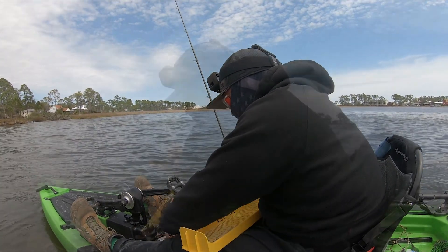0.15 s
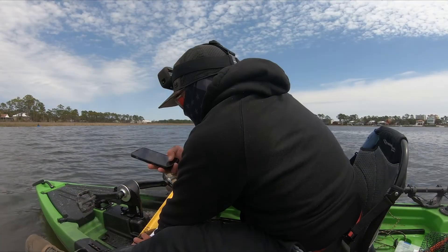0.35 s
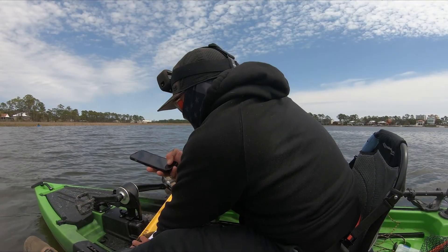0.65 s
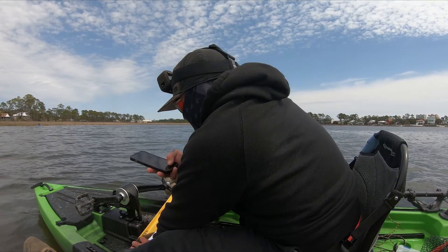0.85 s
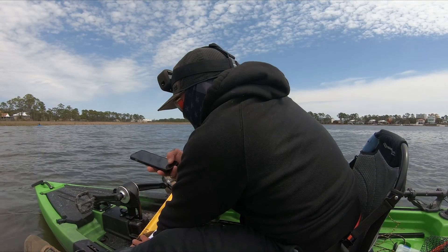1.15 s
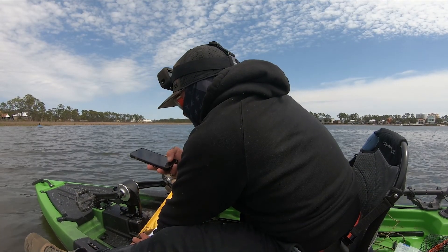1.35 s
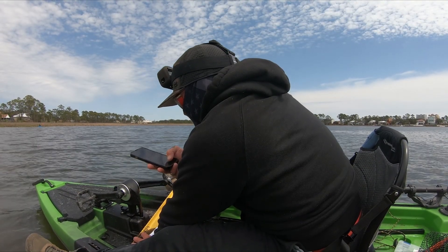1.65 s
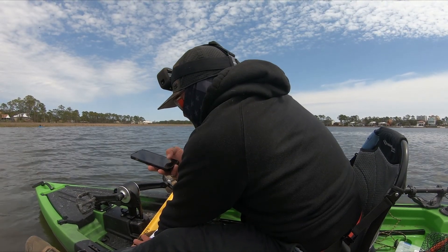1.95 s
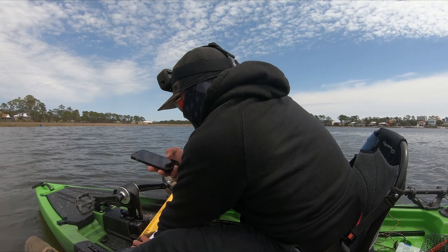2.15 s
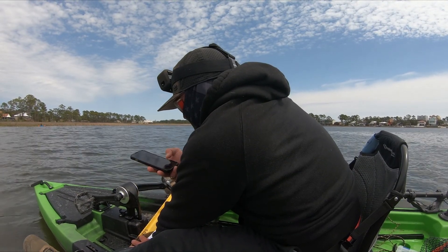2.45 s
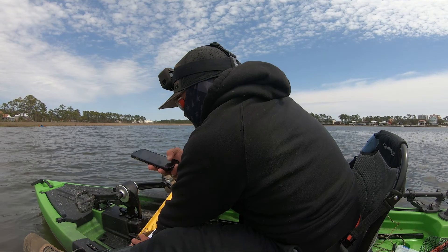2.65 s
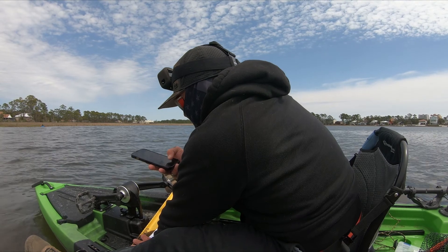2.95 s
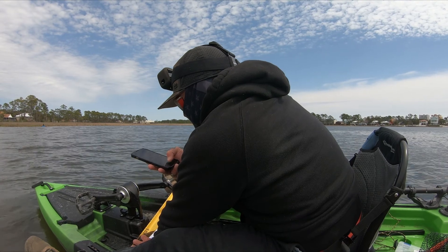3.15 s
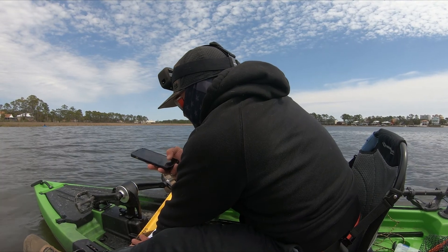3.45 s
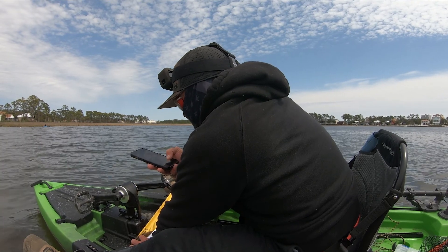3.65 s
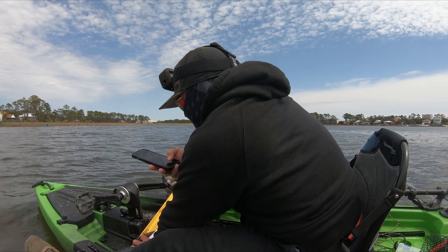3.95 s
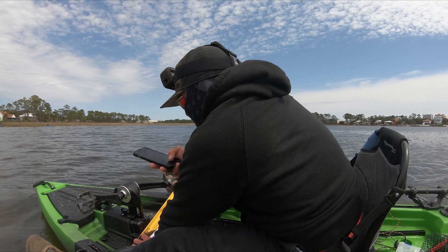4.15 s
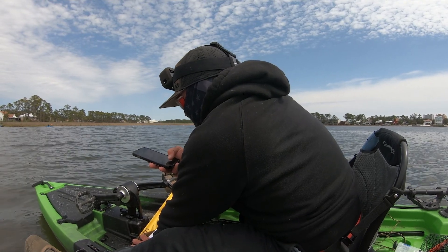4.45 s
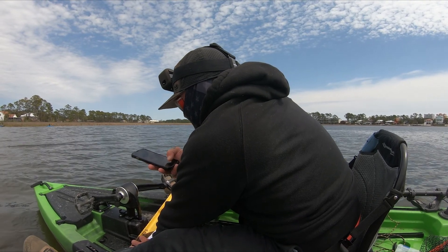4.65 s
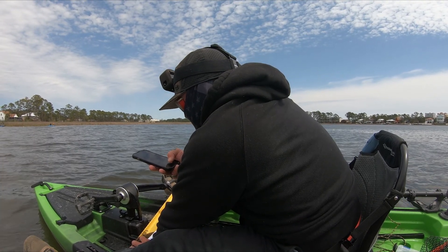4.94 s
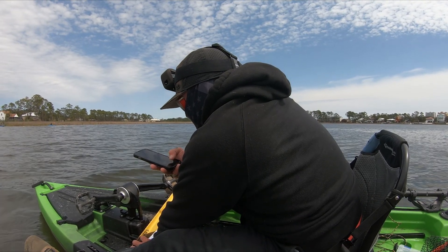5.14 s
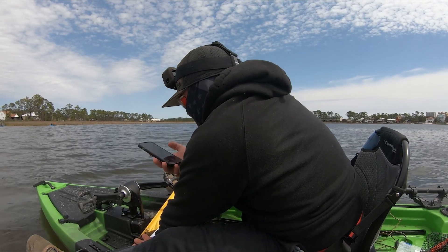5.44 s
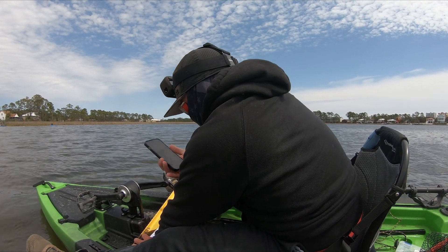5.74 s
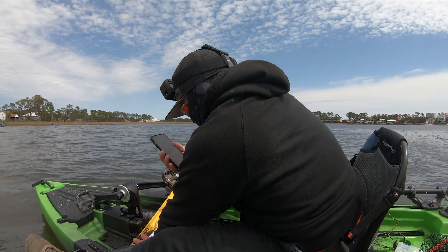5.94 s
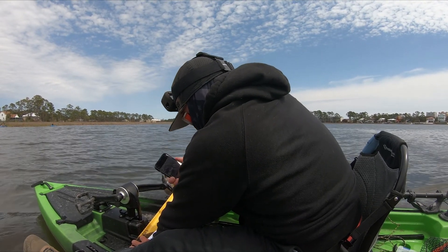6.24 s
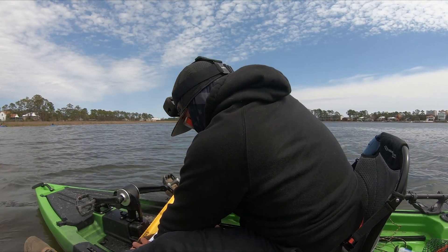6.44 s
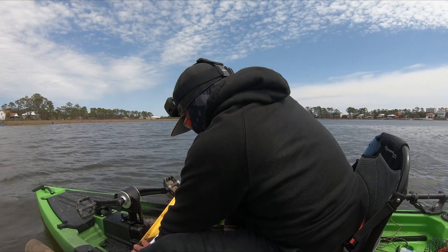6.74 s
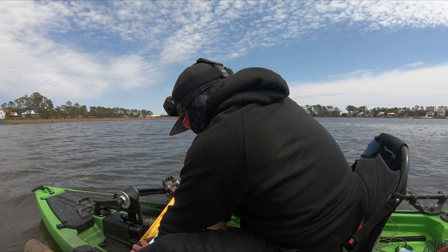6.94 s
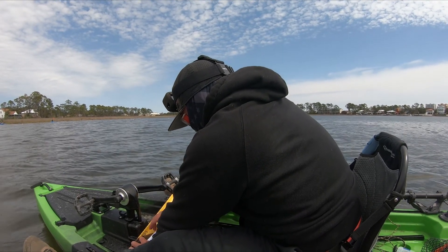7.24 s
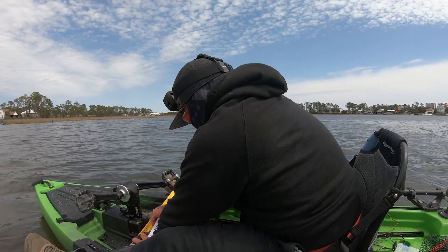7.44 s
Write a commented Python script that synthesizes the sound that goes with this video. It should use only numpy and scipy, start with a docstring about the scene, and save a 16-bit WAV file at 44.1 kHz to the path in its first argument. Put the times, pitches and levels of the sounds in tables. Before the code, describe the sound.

Choppy water slaps a drifting plastic kayak with hollow knocks, drips and low wind rumble, ending in a burst of hard knocks.

```python
"""A plastic kayak drifts on choppy open water, heard at a microphone fixed to the boat. Shaped noise carries
wind, heave, drone, wash and spray; at 0.25 s this background jumps abruptly to another level, with a click as a
short low rise stops dead. Wavelets then slap the hull as briefly swelling sines, and from 0.52 to 5.15 s faint,
thin tones glide. Knocks and scrapes excite resonances of hull and fittings, treble bursts are brief noise and
drops are rising, dying sines, all scattered; the hardest knock falls at 6.96 s."""
import sys
import numpy as np
from scipy import signal
from scipy.fft import rfft, irfft, next_fast_len
from scipy.io import wavfile

SR = 44100
rng = np.random.default_rng(int(sys.argv[2]) if len(sys.argv) > 2 else 0)


def master_out(mix):
    """Clip the mix to full scale and print it as 16-bit PCM to the path in sys.argv[1]."""
    frames = np.transpose(np.atleast_2d(mix))
    ceiling = np.clip(frames, -1, 1)
    pcm = np.round(ceiling * 32767).astype(np.int16)
    wavfile.write(sys.argv[1], SR, pcm)


N = 334719
JUMP_S = 0.2516   # the background jumps to another level here
DULL_ABOVE = 1.65   # a crack or rub is dull above this multiple of its colour

# wavelets on the hull: t/s, peak level/dB, panel pitch f/Hz, swell time/ms
SLAPS = [(0.431, -29.5, 179, 11), (0.57, -30.5, 176, 7.5), (0.609, -30, 217, 14.5),
         (0.924, -28.5, 206, 23.7), (1.487, -18.5, 199, 6.2), (1.507, -21, 182, 10),
         (1.549, -30, 158.3, 26), (1.758, -31, 162, 17), (1.861, -17.5, 187, 13.8), (1.882, -23, 189, 10),
         (1.96, -28, 219, 10), (2.1, -29.5, 161, 4.3), (2.187, -31.5, 148, 4.2), (2.404, -30, 252, 4.3),
         (2.658, -28, 155, 14), (2.816, -16, 230, 4), (2.848, -25, 218, 15), (2.819, -21.5, 335, 8),
         (2.866, -29.5, 199, 9), (2.979, -30, 182, 5), (3.137, -30.5, 177, 9.7), (3.443, -28, 197, 16),
         (3.571, -20, 193.5, 9.8), (3.598, -14.5, 195, 9), (3.642, -26.5, 171, 9.3),
         (3.737, -30.5, 188, 10.3), (3.785, -29.5, 159, 4.3), (3.96, -26, 149, 7.4), (4.012, -17, 184, 9.9),
         (4.491, -23.5, 158, 23), (4.527, -23, 195, 14.4), (4.76, -15, 180, 6.3), (4.827, -20, 162, 6),
         (4.971, -24.5, 169, 2.9), (5.07, -28, 202, 2.3), (5.148, -27.5, 170, 9.7),
         (5.331, -17.5, 212, 10.6), (5.359, -22, 231, 9.8), (5.506, -29, 153.6, 14.5),
         (5.667, -23, 154.8, 16.5), (5.785, -26, 175, 10.7), (5.913, -27, 177, 5.9), (5.934, -30, 219, 12),
         (6.21, -28, 175, 5.2), (6.264, -18.5, 176, 6.3), (6.41, -12.5, 202.8, 15.5),
         (6.457, -24.5, 178, 13), (6.722, -30, 149, 5.1), (6.818, -15, 365, 7.7), (6.931, -18, 203, 2.7),
         (6.958, -17, 416, 14), (6.999, -19.5, 205, 9), (7.006, -26, 326, 6.5), (7.133, -16.5, 220, 4.3),
         (7.156, -33, 236.4, 30), (7.445, -25.5, 176, 14.6), (7.481, -21.5, 214, 9.9)]
# resonant modes of the hull: f/Hz, relative gain/dB, t60/s
HULL_MODES = [(301, 3.5, 0.1), (352, 6, 0.065), (403.4, -0.5, 0.08), (503.6, 5, 0.035), (560, -2.5, 0.091),
              (610, -2, 0.15), (687.5, 0, 0.062), (759, -5.5, .07), (876, -7, 0.07), (1000, 2.5, 0.025),
              (1180, -4.5, 0.034), (1260, -5, 0.041), (1400, -3.5, 0.024)]
# stiff deck fittings, resonances that colour a crack: f/Hz, bandwidth/Hz
FITTINGS = [(1720, 220), (2000, 680), (2350, 200), (2700, 340), (3100, 95), (3600, 72), (4150, 150),
            (4700, 220)]


def amp(db):
    """Level in dB to amplitude ratio: 20 dB is a factor of ten."""
    return 10 ** (np.asarray(db) / 20)


def rms_one(x):
    """Normalise the mean power to 1."""
    return x / np.sqrt(np.mean(x ** 2) + 1e-20)


def drift(rate_hz):
    """Low-passed chance: white noise through a double pole at rate_hz wanders with spread 1."""
    step = 40   # samples between drawn values
    r = np.exp(-2 * np.pi * step * rate_hz / SR)
    white = rng.standard_normal(N // step + 2002)
    slow = signal.lfilter([1], [1, -2 * r, r * r], white)[2000:]
    return np.interp(np.arange(N) / step, np.arange(len(slow)), rms_one(slow - slow.mean()))


def noise(spectrum):
    """Spectral shaping: white noise weighted by frequency gives steady coloured noise of rms 1."""
    size = next_fast_len(N)
    hz = np.maximum(np.arange(size // 2 + 1) * SR / size, 1)
    at, level_db = np.transpose(spectrum)
    gain = amp(np.interp(np.log(hz), np.log(at), level_db, left=-120, right=-120))
    return rms_one(irfft(rfft(rng.standard_normal(size)) * gain, size)[:N])


def ring(clicks, hz, t60):
    """Damped resonance: a unit click starts a sine of height 1 that decays 60 dB in t60 seconds."""
    r, w = amp(-60 / (t60 * SR)), 2 * np.pi * hz / SR
    return signal.lfilter([0, np.sin(w)], [1, -2 * r * np.cos(w), r * r], clicks + 1e-18)


def struck(hz, width_hz, t):
    """Modal impulse response: each mode decays in proportion to its bandwidth."""
    return np.exp(-np.pi * np.outer(width_hz, t)) * np.sin(2 * np.pi * np.outer(hz, t))


def soften(x, hz):
    """Contact compliance: a two-pole low-pass dulls a soft contact."""
    return signal.lfilter(*signal.butter(2, hz, fs=SR), x)


def grains(per_s, low_hz, high_hz, cycles, spread_db, count):
    """Random superposition: scattered clicks each ring at one of several pitches, t60 in cycles; rms 1."""
    sizes = amp(spread_db * np.minimum(rng.exponential(1, N), 4)) * (rng.random(N) < per_s / SR)
    dealt = rng.integers(0, count, N)
    pitches = np.geomspace(low_hz, high_hz, count)
    return rms_one(sum(ring(sizes * (dealt == k), hz, cycles / hz) for k, hz in enumerate(pitches)))


def patchy(x, edges_hz, shared_db, own_db):
    """Band-wise modulation: each band flickers partly on its own."""
    out = 0
    for low, high in zip(edges_hz, edges_hz[1:]):
        band = signal.sosfilt(signal.butter(1, [low, high], "band", fs=SR, output="sos"), x)
        out = out + band * amp(shared_db + own_db * drift(26.0))
    return rms_one(out)


def curve(rows):
    """Linear interpolation: the columns of a (t/s, level/dB, ..) table at every sample."""
    s, *columns = np.transpose(rows)
    return [np.interp(np.arange(N) / SR, s, c) for c in columns]


def add(out, s, sound):
    """Superposition: mix a short sound in at time s."""
    i = int(round(s * SR))
    out[i:i + len(sound)] += sound[:N - i]


def faint_tones():
    """Frequency and amplitude modulation: thin gliding sines whose pitch and level waver at random."""
    # faint tones: start t/s, end t/s, first f/Hz, last f/Hz, level before the waver/dB
    glides = [(.52, .78, 2920, 2900, -80), (2.5, 2.62, 3350, 3250, -76), (2.7, 2.8, 3100, 3050, -76),
              (3.27, 3.47, 4170, 4230, -85), (3.6, 3.8, 3720, 3780, -85), (4.53, 4.76, 1830, 1830, -72),
              (4.6, 4.76, 2150, 2200, -76), (4.62, 4.73, 3160, 3120, -81), (4.7, 4.87, 2830, 2880, -77),
              (4.86, 5.05, 2860, 2915, -75.5), (4.97, 5.14, 3380, 3365, -84), (5.02, 5.15, 1830, 1820, -76)]
    out = np.zeros(N)
    waver = amp(2.5 * drift(25.0))
    blur = 1 + .004 * drift(40.0)
    for start, end, first_hz, last_hz, db in glides:
        i, size = round(start * SR), round((end - start) * SR)
        pitch_hz = np.linspace(first_hz, last_hz, size) * blur[i:i + size]
        phase = 2 * np.pi * np.cumsum(pitch_hz) / SR
        add(out, start, amp(db) * signal.windows.tukey(size, .3) * np.sin(phase))
    return out * waver


def stir():
    """Incoherent addition: the stirring swells round every slap and dies away; powers add."""
    rise_s, t60_s = 0.0019, 0.32
    power, t = np.zeros(N), np.arange(SR) / SR
    shape = (1 - np.exp(-t / rise_s)) * amp(-60 * t / t60_s)
    for s, db, *_ in SLAPS:
        add(power, s - rise_s, (amp(db) * shape) ** 2)
    return np.sqrt(power)


def levels():
    """Power addition of base and stirred gains for rumble, heave, drone, wash, spray, after a steady start."""
    # wind on the microphone port: t/s, rumble level/dB
    wind = [(0.26, -42), (0.28, -38.5), (1.32, -43.5), (1.56, -37), (1.81, -48), (1.93, -34), (2.38, -42.5),
            (3.2, -38.5), (3.32, -51), (3.53, -30), (3.55, -42), (3.95, -35.5), (4.65, -46.5), (5.08, -38),
            (5.16, -52.5), (5.38, -39.5), (6.06, -47), (6.12, -50), (6.22, -40), (7.59, -42)]
    # chop under the hull: t/s, heave base level/dB, drone base level/dB
    chop = [(0.26, -40.5, -47.5), (0.44, -37, -38), (1.08, -44, -46), (1.24, -55.5, -47.5),
            (1.59, -35.5, -36.5), (1.83, -41, -47.5), (1.87, -32.5, -39), (2.38, -50.5, -44.5),
            (2.77, -39.5, -40.5), (3.32, -45, -45.5), (3.55, -35, -41.5), (3.93, -45, -46),
            (4.08, -31.5, -41), (4.18, -40.5, -40.5), (4.91, -39, -44.5), (5.18, -43, -42.5),
            (5.22, -60, -48.5), (5.67, -35.5, -40.5), (6.16, -46.5, -43), (6.24, -34.5, -39),
            (6.53, -35, -39.5), (6.92, -48, -48.5), (6.96, -34, -30), (7.59, -46, -61.5)]
    # spray hiss: t/s, level/dB
    spray_level = [(0.26, -73.5), (0.83, -69.5), (1.2, -73), (1.4, -67.5), (2.44, -71), (2.65, -64),
                   (3.1, -72), (4.53, -70), (4.79, -69), (5.18, -72.5), (6.2, -65), (6.57, -70.5),
                   (6.79, -69.5), (7.0, -66), (7.43, -66.5), (7.59, -68)]
    # base levels before the jump, in dB: rumble, heave, drone, wash, spray
    early_db = (-33, -33, -49, -53.5, -60.5)
    wash_db, wash_follows = -55.5, 0.23   # dB at mean spray; share of the spray's swing
    stir_drone_db, stir_wash_db = -14.5, -39   # against the slap's peak
    (wind_db,), (heave_db, drone_db), (spray_db,) = curve(wind), curve(chop), curve(spray_level)
    stirred = stir()
    drone = np.hypot(amp(drone_db), amp(stir_drone_db) * stirred)
    calm_wash = amp(wash_db + wash_follows * (spray_db - spray_db.mean()))
    wash_gain = np.hypot(calm_wash, amp(stir_wash_db) * stirred)
    after = [amp(wind_db), amp(heave_db), drone, wash_gain, amp(spray_db)]
    return np.where(np.arange(N) < JUMP_S * SR, amp(early_db)[:, None], after)


def wind_rumble(gain):
    """Flow noise: wind on the microphone port gives low random pressure."""
    # rumble spectrum: f/Hz, relative spectral level/dB
    rumble = [(10, -21.5), (20, -6), (33, 2), (50, 2), (70, -20.5)]
    return gain * noise(rumble)


def hull_heave(gain):
    """Low-frequency radiation: the hull heaves on the chop as slowly wavering noise."""
    # heave spectrum: f/Hz, relative spectral level/dB
    heave = [(35, -15), (55, -3.5), (80, 0), (110, -3.5), (140, -20), (220, -34)]
    return gain * noise(heave) * amp(2.0 * drift(2.2))


def hull_drone(gain):
    """Random excitation: the hull drones on the chop beneath a patter of small ringing laps."""
    # drone spectrum: f/Hz, relative spectral level/dB
    drone = [(100, -25), (135, -4.5), (160, 0.5), (200, -6.5), (260, -14.5), (330, -32.5), (450, -29.5)]
    patter = rms_one(soften(grains(78, 150, 330, 13.0, 2.5, count=6), 400))   # 78 laps per second
    return gain * (noise(drone) * amp(1.2 * drift(6.0)) + amp(-4) * patter)


def water_wash(gain, chop):
    """Turbulent broadband sound: bands of washing water flicker."""
    # wash spectrum: f/Hz, relative spectral level/dB
    wash = [(250, -16.5), (400, 1), (700, -3), (1000, -7), (1500, -11.5), (2000, -30.5), (2600, -46)]
    return gain * patchy(noise(wash), [250, 550, 1100, 2600], 0.11 * chop, 2.98)


def spray_hiss(gain, chop):
    """Turbulence and bubble resonance: flickering hiss with fine ringing bubbles under it."""
    # spray spectrum: f/Hz, relative spectral level/dB
    spray = [(1200, -7), (1900, 4), (2500, -5), (3500, -5.5), (4700, -12.5), (5300, -19.5), (5900, -29.5),
             (7300, -20), (8500, -28.5), (10000, -41.5)]
    bubbles_per_s, bubbles_db = 280, -14.5   # level against the hiss
    bubbles = rms_one(soften(grains(bubbles_per_s, 880, 5100, 45.0, 3.6, count=14), 3000))
    hiss = patchy(noise(spray), [1200, 2200, 3500, 5600, 10000], 1.0 * chop, 1.8)
    return gain * (hiss + amp(bubbles_db) * bubbles)


def weather():
    """Superposition of wind and water, each following its own level."""
    wind, heave, drone, wash, spray = levels()
    chop = drift(6.0)   # passing wavelets lift wash and spray together
    air_and_hull = wind_rumble(wind) + hull_heave(heave) + hull_drone(drone)
    return air_and_hull + water_wash(wash, chop) + spray_hiss(spray, chop)


def jump_click():
    """Step discontinuity: a short low rise stops dead with a click as the background jumps."""
    peak_db, swell_ms = -21.5, 9.6
    out, size = np.zeros(N), round(swell_ms * SR / 1000)
    add(out, JUMP_S - size / SR, -amp(peak_db) * np.sin(np.linspace(0, np.pi / 2, size)) ** 2)
    return out


def drops():
    """Bubble resonance: a trapped bubble rings and rises in pitch as it nears the surface."""
    # drops: t/s, level before a 12 dB lift and the envelope/dB, starting pitch f/Hz, cycles to 30 dB decay
    plinks = [(0.199, -43, 1140, 14), (.216, -52, 2500, 20), (1.435, -62.5, 2130, 20),
              (1.458, -61, 1770, 33), (1.537, -66, 2550, 38), (1.552, -59, 2050, 27),
              (1.553, -62, 2900, 18), (1.592, -64, 3600, 24), (1.608, -67, 3900, 26),
              (1.613, -64, 3450, 30), (2.007, -62, 2680, 19), (2.055, -47, 837, 33), (2.071, -56, 1180, 16),
              (2.489, -40, 3270, 14), (2.502, -57, 3700, 12), (2.612, -57, 3700, 15),
              (2.617, -63, 3000, 30), (2.716, -60, 2950, 17), (2.631, -56, 3220, 17),
              (2.634, -56, 3800, 20), (2.659, -53.5, 3270, 24), (2.666, -51, 2340, 14),
              (2.672, -54, 2360, 17), (2.692, -50, 1260, 14), (2.708, -45.5, 1180, 18),
              (2.73, -45.5, 1360, 10), (4.118, -51, 1000, 12), (4.596, -49.5, 1320, 30),
              (5.46, -45, 1160, 10), (5.466, -43, 1150, 8.5), (3.857, -65, 3300, 16), (4.82, -51, 2740, 15),
              (6.865, -65, 2880, 70), (6.912, -65, 3150, 33), (3.349, -48, 1140, 15),
              (3.427, -66, 3200, 10), (4.488, -58.5, 1400, 15), (7.209, -39, 1686, 18.6),
              (7.458, -45.5, 1080, 16)]
    # pitch climbs by twice this share over those cycles at rise_hz; small, high drops climb more
    rise, rise_hz = 0.073, 3000
    out, t = np.zeros(N), np.arange(round(.08 * SR)) / SR
    for s, db, hz, cycles in plinks:
        shape = (1 - np.exp(-t * hz / 1.5)) ** 2 * amp(-60 * t * hz / (2 * cycles))
        climb = 1 + rise * (hz / rise_hz) ** 2 * t * hz / cycles
        add(out, s, amp(db + 12.0) * shape * np.sin(2 * np.pi * hz * t * climb))
    return out


def treble_bursts():
    """Band-limited noise: very short bright bursts round one pitch, mostly at the knocks and drops."""
    # bright bursts: t/s, nominal level/dB, pitch f/Hz, t60/ms (at least 5)
    bursts = [(1.539, -69, 7870, 25), (2.481, -56, 8800, 13), (2.489, -68, 8300, 58),
              (2.631, -72, 7940, 54), (2.669, -77, 7900, 65), (3.224, -76, 9000, 40),
              (2.815, -67, 7950, 25), (3.343, -73.5, 6900, 40), (3.574, -70, 7990, 20),
              (3.644, -65, 8400, 20), (3.651, -71, 8450, 79), (6.432, -69, 7800, 100),
              (6.958, -53.5, 6800, 21), (7.169, -73, 7600, 37), (7.209, -57, 7660, 16),
              (7.425, -63, 7850, 25), (7.458, -56, 7200, 16)]
    spread = 1 + 0.13   # band edges are the pitch divided and multiplied by this
    out, t = np.zeros(N), np.arange(round(.08 * SR)) / SR
    whites = rng.standard_normal((len(bursts), len(t)))
    for (s, db, hz, t60_ms), white in zip(bursts, whites):
        band = signal.butter(2, [hz / spread, hz * spread], "band", fs=SR, output="sos")
        burst = rms_one(signal.sosfilt(band, white))
        shape = (1 - np.exp(-t / 0.0004)) ** 2 * amp(-60000 * t / max(t60_ms, 5))
        add(out, s, amp(db - 1.5) * burst * shape)
    return out


def scrapes():
    """Stick-slip friction: uneven catches swell and fade, ringing modes near the colour of the rub."""
    # gear drags over the hull: start t/s, length/s, nominal level/dB, colour f/Hz, loudest at share of length
    drags = [(0.0, 0.091, -59, 3600, 0.22), (0.019, 0.27, -51, 1420, 0.39), (2.021, 0.082, -51, 1000, 0.43),
             (2.456, 0.064, -54, 3000, .6), (2.818, 0.09, -45, 440, 0.27), (3.585, 0.037, -50, 596, 0.24),
             (3.632, 0.034, -51, 2900, .5), (4.103, 0.032, -52, 1000, .6), (4.868, 0.015, -62, 4400, .4),
             (4.919, 0.024, -55, 2000, 0.65), (5.343, 0.046, -44.5, 2210, 0.56),
             (5.947, 0.24, -61, 2520, 0.26), (6.404, 0.055, -51, 2860, 0.46),
             (6.888, 0.057, -57.5, 1210, .5), (6.943, 0.023, -40, 1500, 0.55),
             (6.962, 0.046, -28.5, 456, 0.35), (6.959, 0.035, -36, 1450, 0.13),
             (6.976, 0.062, -38.5, 946, 0.29), (7.098, 0.043, -57.5, 2600, 0.73),
             (7.125, 0.07, -41.5, 1180, 0.38), (7.397, 0.042, -38, 1220, 0.5),
             (7.433, 0.029, -54, 1500, .3)]
    catches_per_s, catch_spread_db, fall_db_per_octave = 1500, 3.2, 16
    out, t = np.zeros(N), np.arange(round(.06 * SR)) / SR
    hull = [(hz, np.log(1000) / np.pi / t60) for hz, _, t60 in HULL_MODES]   # bandwidth from t60
    hz, width_hz = np.transpose(hull + FITTINGS)
    rings, luck = struck(hz, width_hz, t), rng.random((len(drags), 3, SR // 3))
    for (s, length, db, colour_hz, top), (born, size, sign) in zip(drags, luck):
        u = np.arange(SR // 3) / SR / length
        swell = np.interp(u, [0, np.clip(top, .05, .95), 1], [0, 1, 0])
        sizes = amp(-catch_spread_db * np.log(size + .02))
        catches = (born < catches_per_s / SR) * sizes * np.sign(sign - .5)
        away = np.abs(np.log2(hz / colour_hz))
        body = (amp(-fall_db_per_octave * away) * np.sqrt(width_hz)) @ rings
        rub = signal.fftconvolve(catches * swell, body / np.sqrt(np.sum(body ** 2)))
        rub = soften(soften(rub, DULL_ABOVE * colour_hz), 5000)
        add(out, s, amp(db) * rub / np.sqrt(np.mean(catches ** 2)))
    return out


def hull_body(table):
    """Modal excitation: a touch and two small rebounds ring the hull, favouring the struck spot's mode."""
    split_hz = 520   # the lower body rings below, the upper above
    favour_db, rebound_loss_db = 8.5, 7.5   # lift of the favoured mode; loss at a rebound of usual length
    dull_db, usual_dying_ms = 6, 71   # more loss per octave above the split; a longer knock loses less
    luck = rng.normal(0, 3, (len(table), 3, len(HULL_MODES)))   # dB
    lags = np.cumsum(rng.uniform(0.003445, .012, (len(table), 3)), axis=1) * [0, 1, 1]
    at = np.round((table[:, :1] + lags) * SR).astype(int)
    body = np.zeros(N)
    for k, (hz, db, t60) in enumerate(HULL_MODES):
        clicks = np.zeros(N)
        away = np.abs(np.log2(hz / table[:, 2]))
        upper_db = table[:, 1] - 3.6 * away + favour_db * np.exp(-(away / 0.087) ** 2)
        first_db = upper_db if hz > split_hz else table[:, 3]
        loss_db = rebound_loss_db * usual_dying_ms / table[:, 6] + dull_db * max(np.log2(hz / split_hz), 0)
        blow_db = first_db[:, None] - loss_db[:, None] * np.arange(3)
        clicks[at] = amp(blow_db + db - 12 + luck[:, :, k]) * (-1) ** (k // 2)
        body += ring(clicks, hz, t60)
    return soften(soften(body, 2900), 4200)


def cracks(table):
    """Resonant filtering: a tap and gritty noise sound through the stiff fittings, with a bright fizz."""
    # crack spectrum: f/Hz, relative spectral level/dB
    crack_colour = [(700, -16.5), (1500, -0.5), (2500, -8), (3500, -4), (4800, -8.5), (5600, -30.5),
                    (6500, -38)]
    # fizz spectrum: f/Hz, relative spectral level/dB
    fizz_colour = [(5500, -26.5), (6800, -10), (7800, -8), (9000, -11), (11000, -21.5), (13000, -32.5)]
    usual_fizz_db, usual_crack_db = -80, -46.5   # fizz at a usual crack
    fizz_follows, fizz_db_per_octave = .6, 1.5   # share of the crack's swing; brighter cracks fizz more
    rise_share, tap_db, grit_db = 0.022, 3.5, -22   # share of dying time; tap under crack; uncoloured part
    above_db_per_octave, below_db_per_octave = 21, 9   # a crack falls away from its colour
    out, t = np.zeros(N), np.arange(round(.15 * SR)) / SR
    fizz = noise(fizz_colour)
    grit = rms_one(noise(crack_colour) * amp(1.7 * drift(170.0)))
    rung = np.array([signal.lfilter(*signal.iirpeak(hz, hz / width_hz, fs=SR), grit)
                     for hz, width_hz in FITTINGS])
    fitting_hz, fitting_width_hz = np.transpose(FITTINGS)
    taps = struck(fitting_hz, fitting_width_hz + 60, t) * (1 - np.exp(-t[None] / 0.00088))
    shares = rng.normal(0, 1.0, (len(table), len(FITTINGS)))   # dB
    for (s, _, _, _, crack_db, colour_hz, dying_ms), share in zip(table, shares):
        fizz_db = usual_fizz_db + fizz_follows * (crack_db - usual_crack_db)
        fizz_db += fizz_db_per_octave * np.log2(colour_hz / FITTINGS[1][0])
        decay = 0.81 * amp(-60000 * t / (0.33 * dying_ms)) + 0.53 * amp(-60000 * t / dying_ms)
        tail = (1 - np.exp(-1000 * t / (rise_share * dying_ms))) * decay
        now = slice(round(s * SR), round(s * SR) + len(t))
        octaves = np.log2(fitting_hz / colour_hz)
        fall_db = np.maximum(above_db_per_octave * octaves, -below_db_per_octave * octaves)
        gains = amp(2.5 + share - fall_db)
        crack = amp(grit_db) * grit[now] + gains @ rung[:, now]
        crack = soften(soften(crack, DULL_ABOVE * colour_hz), 3.6 * colour_hz)
        add(out, s, amp(crack_db - tap_db) * (gains * (-1) ** np.arange(len(gains))) @ taps)
        add(out, s, tail[:len(crack)] * (amp(crack_db) * crack + amp(fizz_db) * fizz[now]))
    return out


def knocks():
    """Impact excitation: gear striking the hull rings its modes and cracks through the fittings."""
    # gear on the hull: t/s, nominal upper body level/dB, its strongest pitch f/Hz, nominal lower body level/dB,
    # nominal crack level/dB, crack colour f/Hz, dying time (t60 of the slower tail)/ms
    blows = [(0.128, -35, 770, -31, -40, 2020, 57), (0.194, -35, 1180, -51, -43, 2480, 66),
             (0.61, -41, 710, -33.5, -55.5, 1980, 89), (0.634, -39.5, 540, -40.5, -57, 3000, 110),
             (0.9255, -29, 1400, -21.5, -48, 1720, 81), (1.507, -28.5, 1000, -25, -55, 2000, 68),
             (1.856, -37, 820, -47, -50, 3600, 83), (1.951, -58, 566, -37, -55, 2070, 59),
             (2.482, -45, 1400, -69, -42.5, 4400, 16), (2.484, -59, 1400, -75, -42, 2350, 35),
             (2.611, -45, 596, -59, -62, 3600, 180), (2.687, -60, 1250, -54, -53.5, 3300, 280),
             (2.812, -37, 1046, -23.5, -37.5, 1750, 68), (2.825, -31, 607, -26, -76, 2000, 61),
             (2.98, -35.5, 1090, -28.5, -50.5, 1900, 60), (2.989, -28, 550, -30.5, -71, 2020, 76),
             (3.225, -54, 552, -60, -58, 2050, 41), (3.342, -39, 1170, -55, -51, 2120, 21),
             (3.467, -64, 627, -33, -54.5, 4300, 130), (3.573, -25, 770, -23, -41.5, 3070, 64),
             (3.641, -26, 880, -45, -46, 2000, 27), (3.65, -59, 610, -54, -39.5, 3000, 73),
             (3.708, -34.5, 860, -31.5, -65, 2040, 100), (3.785, -36.5, 688, -31.5, -79, 1910, 140),
             (4.004, -35, 1180, -27.5, -50, 1720, 71), (4.115, -32, 1010, -37.5, -62.5, 1960, 98),
             (4.191, -46, 900, -51, -55, 3300, 99), (4.203, -38, 744, -40, -64, 2000, 200),
             (4.488, -37.5, 1180, -41, -57.5, 2040, 69), (4.589, -43, 1400, -44, -52, 2240, 91),
             (4.603, -40, 667, -39, -64, 2000, 140), (4.818, -34.5, 1180, -28, -50, 2950, 52),
             (4.856, -49, 600, -46, -53.5, 3300, 120), (4.938, -33, 674, -35, -58, 2890, 310),
             (4.97, -56, 600, -31, -77, 2870, 140), (5.361, -42, 1400, -35, -35, 1900, 35),
             (5.369, -30.5, 717, -28.5, -45, 2900, 51), (5.928, -42, 620, -25, -58, 1910, 54),
             (6.346, -30.5, 1280, -37.5, -49, 1720, 90), (6.405, -29.5, 570, -22, -46.5, 2050, 40),
             (6.434, -45, 646, -32, -57, 2060, 57), (6.723, -65, 764, -32, -65.5, 1960, 41),
             (6.817, -23.5, 775, -16.5, -45, 1960, 85), (6.943, -29, 555, -22, -47.5, 1880, 170),
             (6.957, -11, 1324, -12, -18, 1800, 36), (6.996, -19.5, 910, -18.5, -46.5, 3000, 100),
             (7.127, -20.5, 687, -25, -39.5, 2000, 47), (7.155, -32, 523, -20.5, -41, 2020, 57),
             (7.173, -28, 950, -34, -56, 2000, 64), (7.198, -33, 675, -41, -52, 2100, 94),
             (7.208, -41, 650, -34, -46, 1910, 71), (7.328, -55, 848, -72, -52, 2260, 45),
             (7.413, -32, 1250, -45, -46, 1750, 64), (7.425, -29.5, 846, -33, -37.5, 2800, 76),
             (7.458, -36, 1090, -34.5, -48, 2580, 80)]
    table = np.array(blows)
    return hull_body(table) + cracks(table)


def slaps():
    """Fluid loading: water loads a panel softly and damps it soon; a few cycles swell and stop short."""
    out, t = np.zeros(N), np.arange(round(.12 * SR)) / SR
    for (s, db, hz, swell_ms), wobble in zip(SLAPS, rng.normal(0, 1, (len(SLAPS), 1))):
        u = t * 1000 / max(swell_ms, 1)
        shape = u * np.exp((1 - u ** 2) / 2)   # peaks at 1 after the swell time
        glide = 1 + .8 * wobble * t   # pitch slides slightly up or down
        add(out, s - .002, amp(db) * shape * np.sin(2 * np.pi * hz * t * glide))
    return out


def scene():
    """Superposition: everything reaches one microphone."""
    background = faint_tones() + weather() + jump_click()
    return (background + drops() + treble_bursts() + scrapes() + knocks() + slaps())[None]


def record(dry):
    """Band limiting: a soft ceiling on the level and a very faint, steady hiss, then a low-pass."""
    ceiling, hiss_db, cutoff_hz = .42, -100, 16900   # amplitude; rms before the low-pass; stopband edge
    level = dry / (1 + np.abs(dry / ceiling) ** 4) ** .25
    level = level + amp(hiss_db) * rng.standard_normal(dry.shape)
    return signal.sosfilt(signal.cheby2(16, 70, cutoff_hz, fs=SR, output="sos"), level)


dry = scene()
out = record(dry)
master_out(out)
```